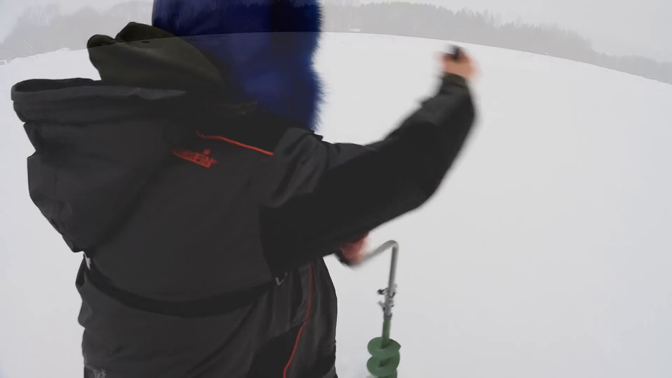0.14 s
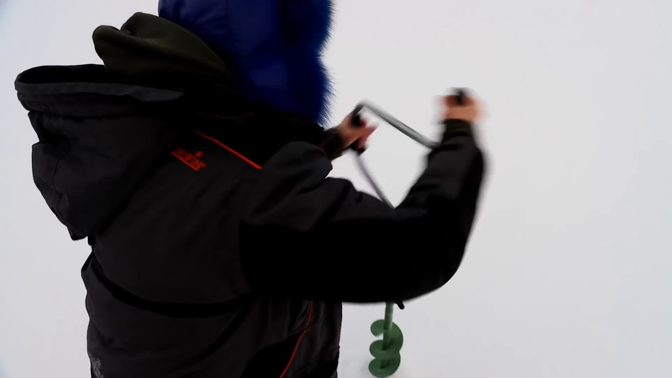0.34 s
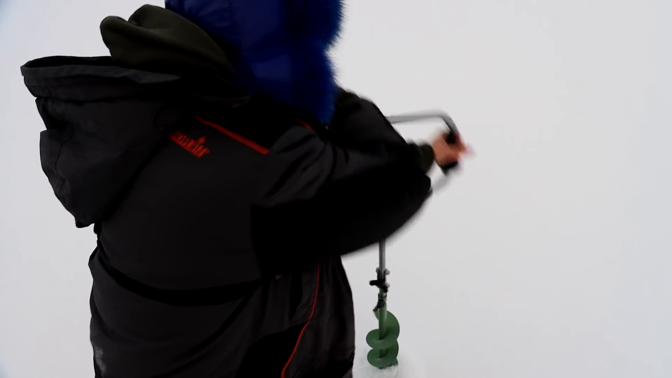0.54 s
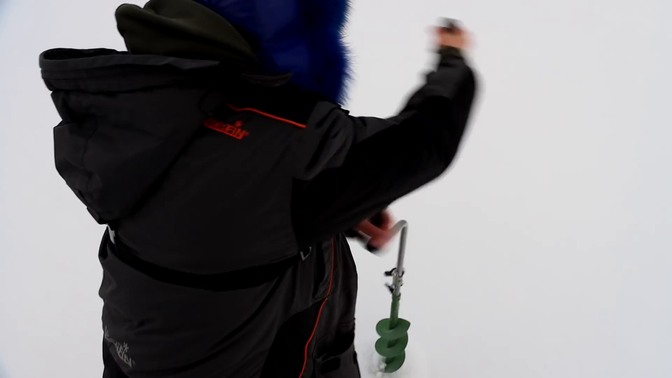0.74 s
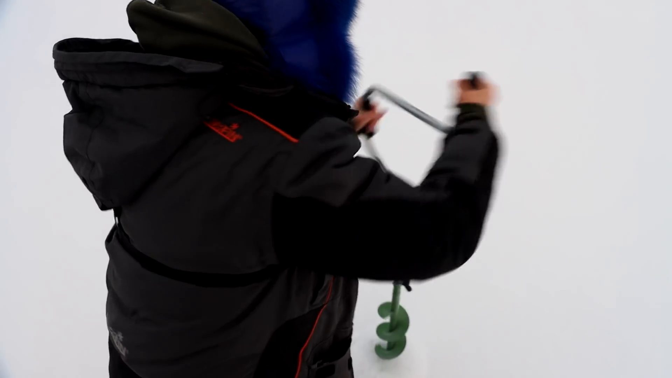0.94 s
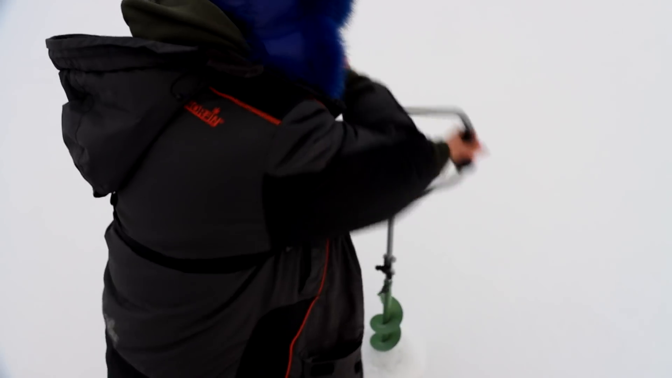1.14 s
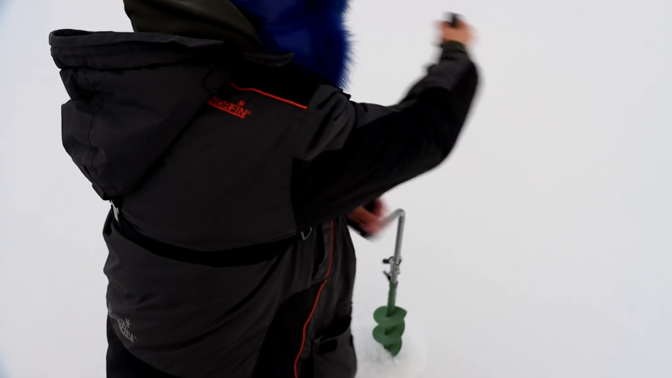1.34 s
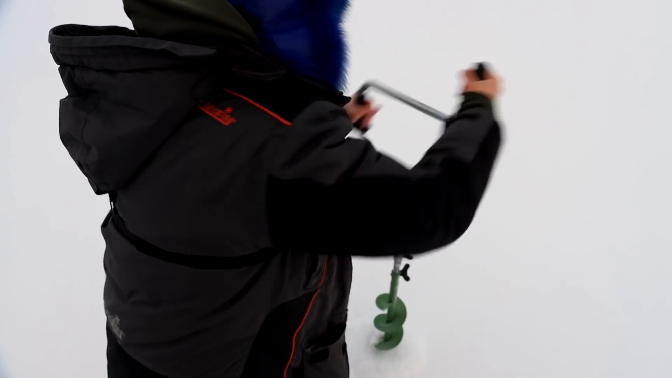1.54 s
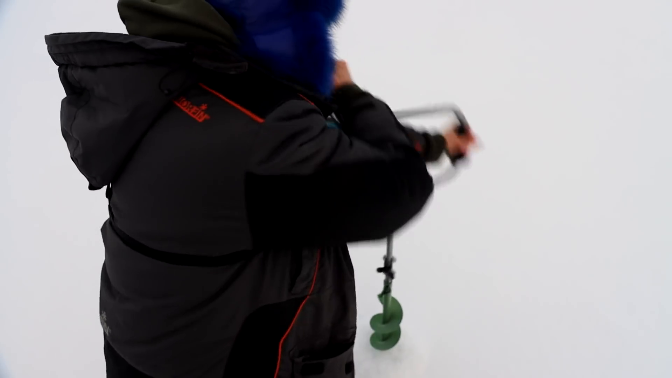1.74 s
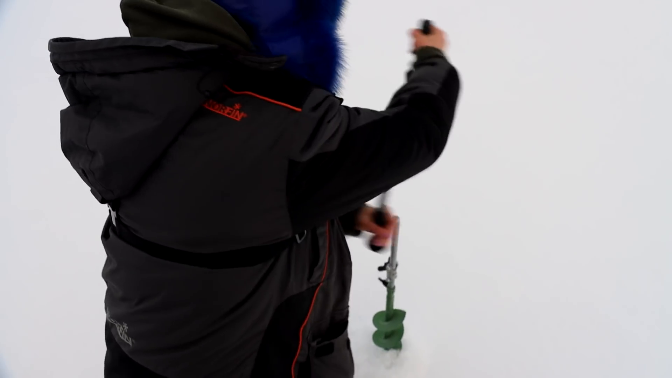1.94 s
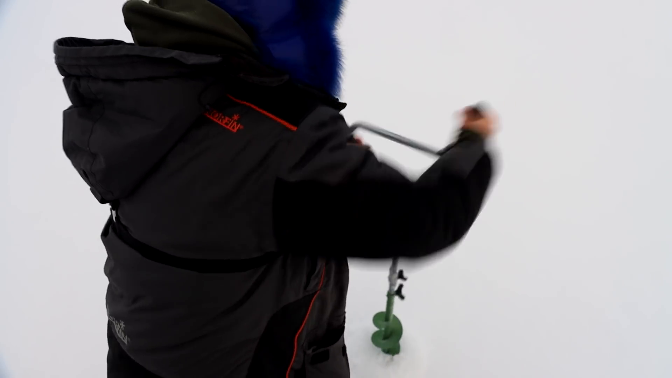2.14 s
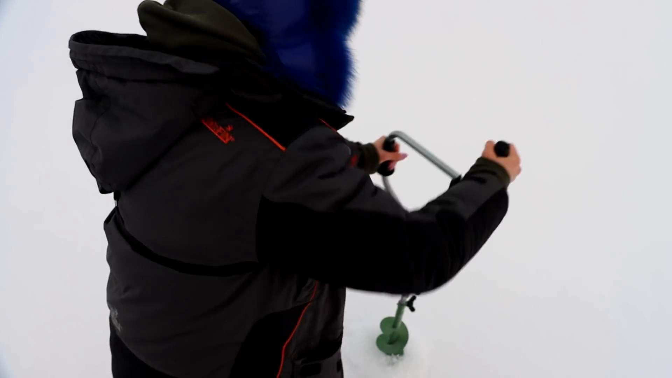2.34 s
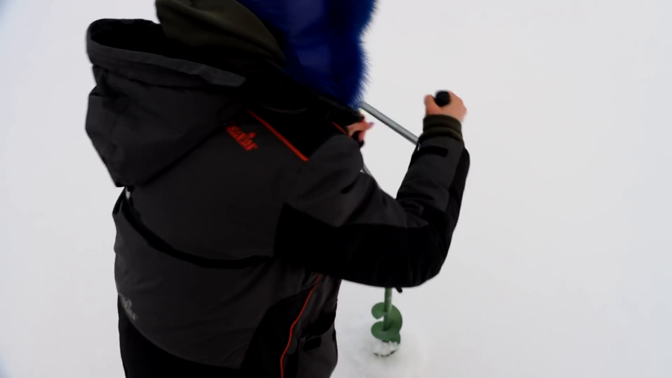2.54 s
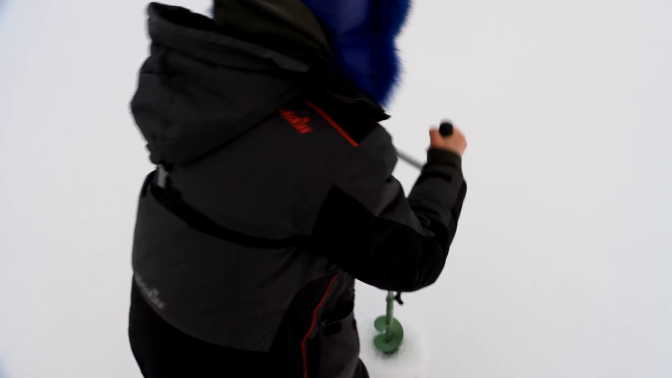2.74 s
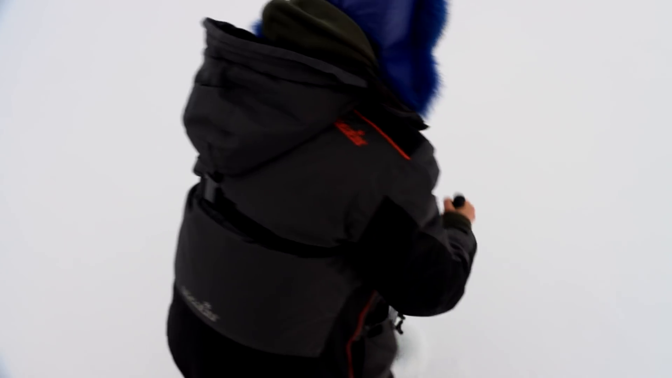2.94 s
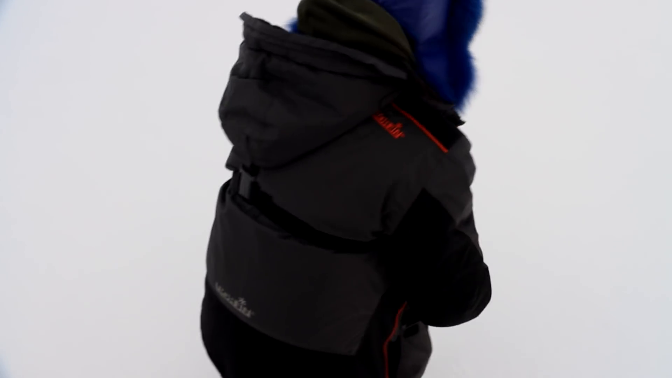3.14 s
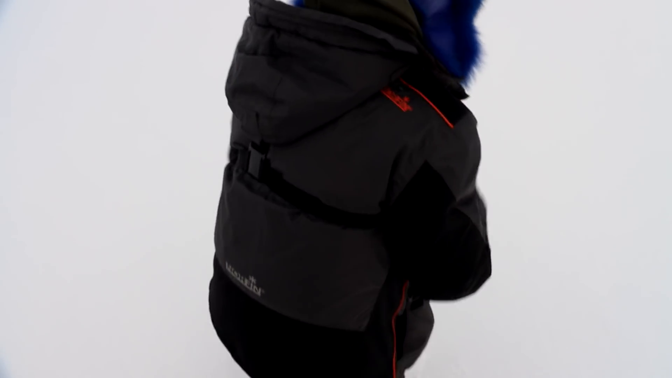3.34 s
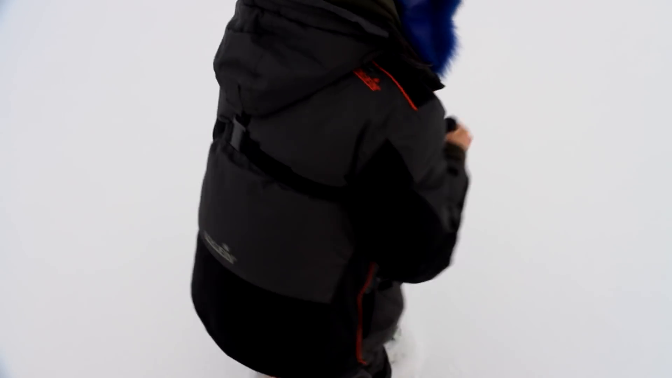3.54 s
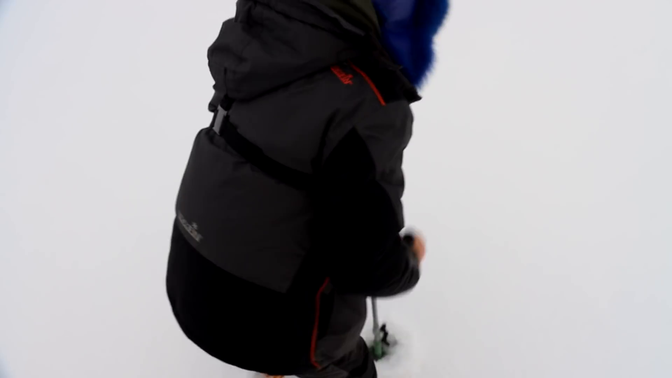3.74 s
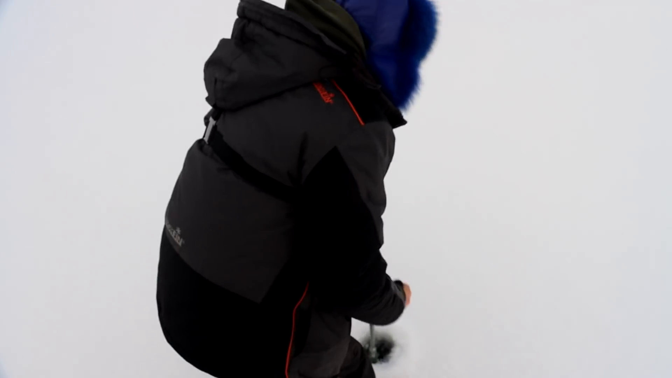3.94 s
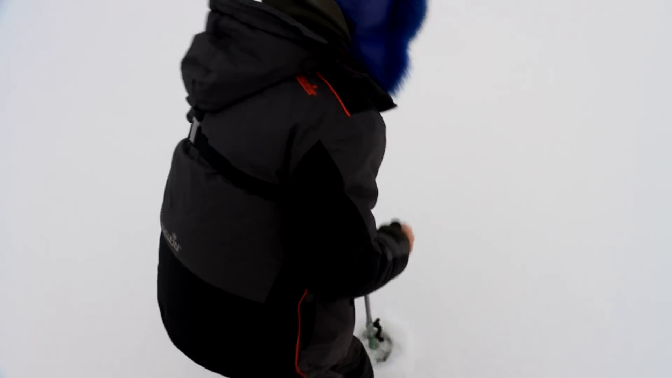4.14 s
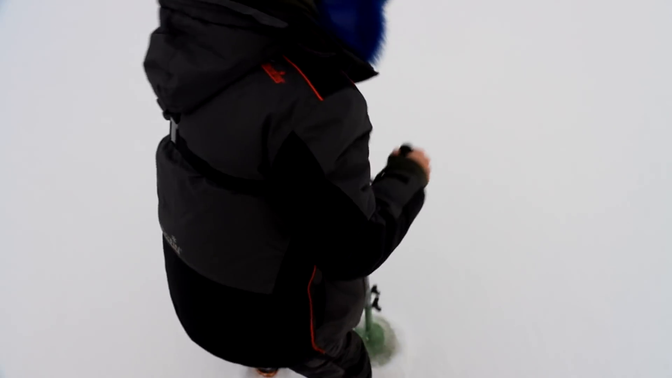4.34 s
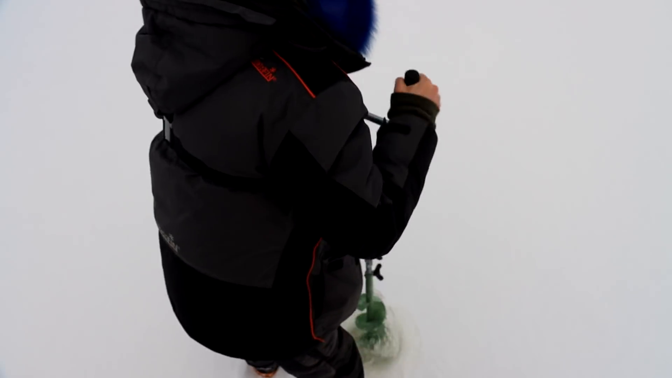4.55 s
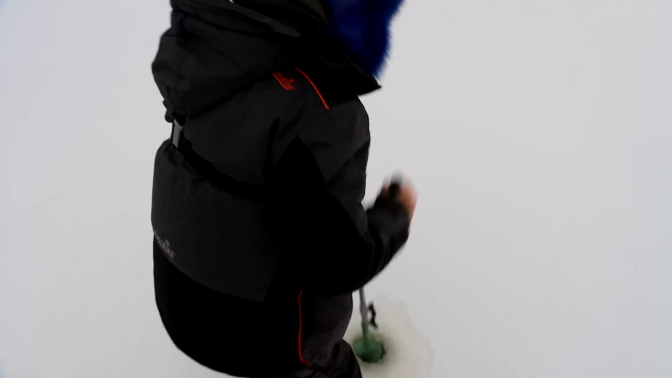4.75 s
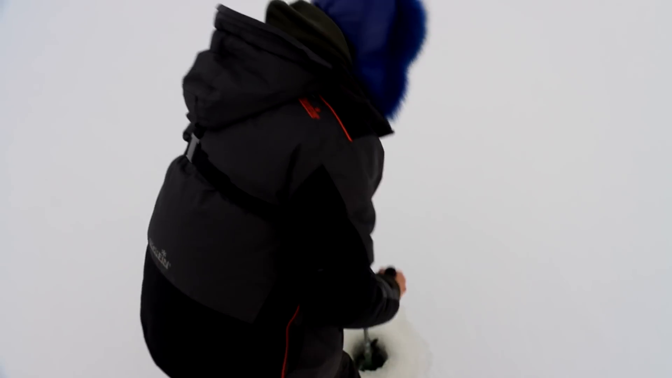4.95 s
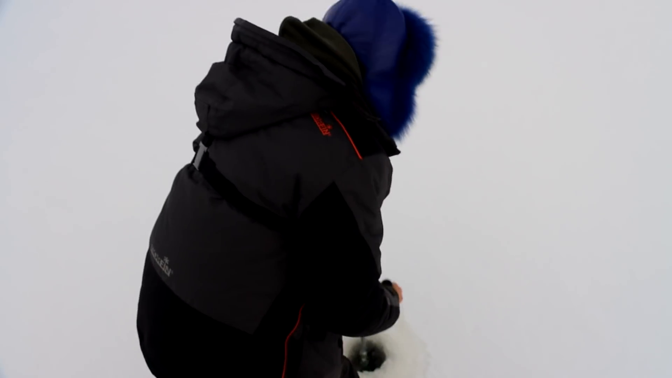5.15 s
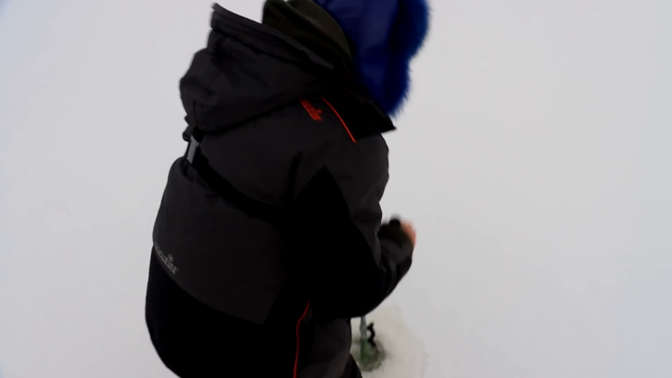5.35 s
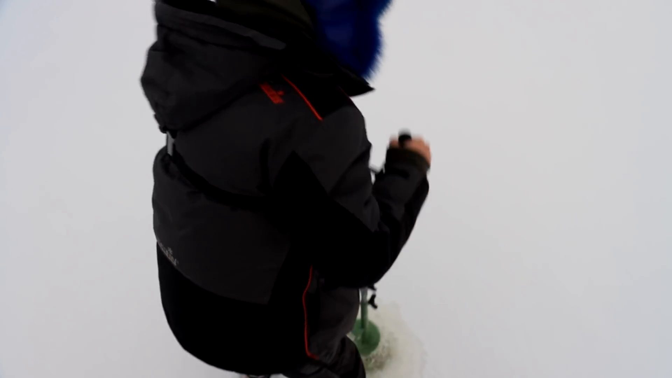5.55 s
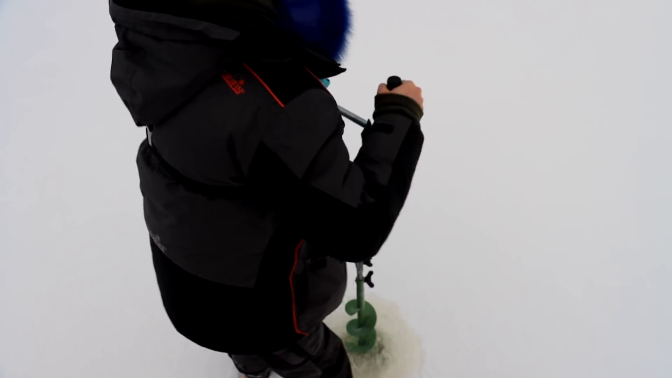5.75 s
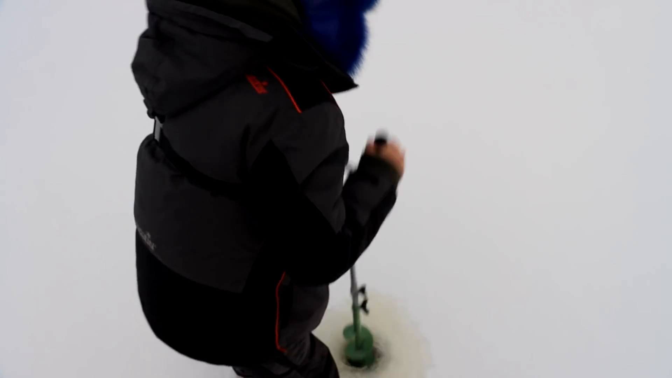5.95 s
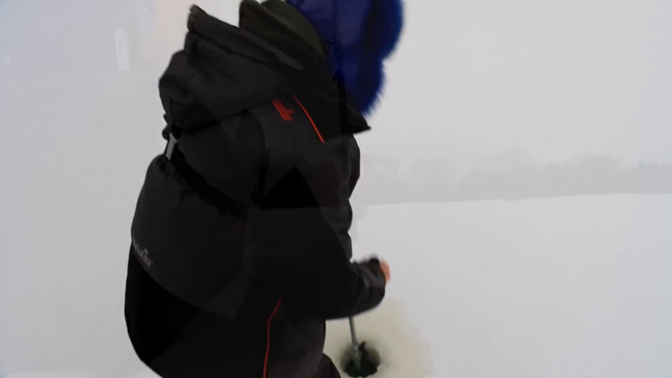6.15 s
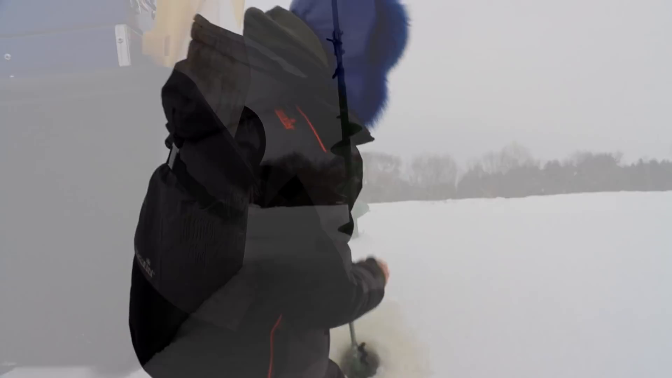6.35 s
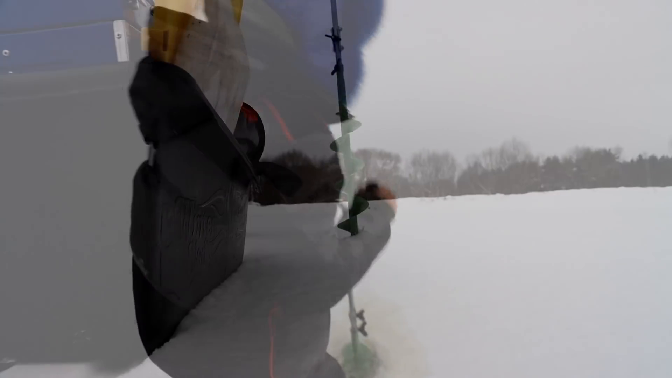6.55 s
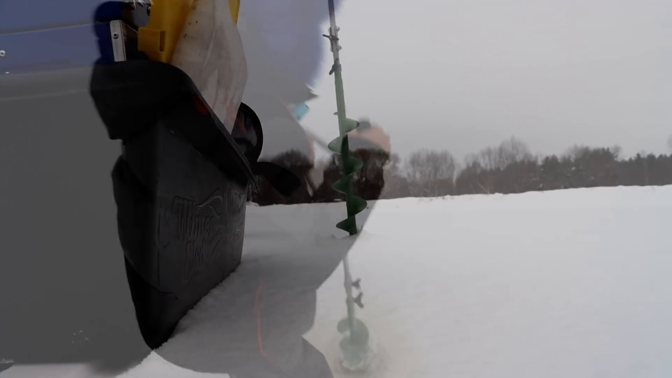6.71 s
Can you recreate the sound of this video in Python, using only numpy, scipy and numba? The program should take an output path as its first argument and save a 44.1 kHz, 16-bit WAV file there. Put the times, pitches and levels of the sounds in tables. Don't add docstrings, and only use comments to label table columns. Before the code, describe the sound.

Scraping, juddering ice drilling for two seconds, then breakthrough and splashy slush churning, hollow water plops and knocks on steel, under faint wind buffeting.

```python
import sys
import numpy as np
from scipy import signal
from scipy.fft import rfft, irfft, next_fast_len
from scipy.io import wavfile
from scipy.ndimage import uniform_filter1d
from numba import njit

SR = 44100
rng = np.random.default_rng(int(sys.argv[2]) if len(sys.argv) > 2 else 0)


def convert_level_to_amplitude(level_db):
    exponent = np.asarray(level_db, float) / 20
    return 10 ** exponent


def log_audio(samples):
    frames = np.atleast_2d(samples).T
    limited = np.clip(frames, -1, 1)
    pcm = np.round(limited * 32767).astype(np.int16)
    wavfile.write(sys.argv[1], SR, pcm)


N = 303408
SIZE = next_fast_len(N + 4096)
FREQ_HZ = np.arange(SIZE // 2 + 1) * SR / SIZE + 1e-3
TIME_S = np.arange(N) / SR

# [f/Hz, density/dB per Hz]
SLUSH_COLOUR = [(88, -61), (150, -22.5), (201, -6.5), (333, -4), (428, 0), (573, 5), (968, -0.5),
                (1480, -9), (2320, -6), (2560, -10.5), (4410, -24.5), (5450, -22.5), (7300, -27),
                (10600, -23.5), (15600, -30.5)]
# [t/s, peak/dB, f/Hz]
PLOPS = [(2.165, -22, 280), (6.09, -15, 310), (2.622, -18.5, 400), (2.791, -19.5, 623), (2.846, -13, 327),
         (2.856, -20, 1014), (3.199, -24, 620), (3.401, -13.5, 362), (3.46, -6, 665), (3.728, -14.5, 593),
         (4.258, -18, 570), (4.291, -25, 490), (4.31, -16.5, 570), (4.359, -19, 750), (4.398, -6.5, 497),
         (4.432, -11.5, 497), (4.52, -9.5, 788), (4.91, -15.5, 640), (5.01, -17, 676),
         (5.055, -20.5, 887.6), (5.058, -22, 184), (5.224, -27.5, 680), (5.569, -6.5, 395),
         (5.538, -20, 560), (5.602, -20, 437), (6.202, -16, 273), (6.608, -17.5, 345)]
# [t/s, peak/dB, f/Hz]
GULPS = [(3.07, -36, 353), (5.236, -35, 185), (5.33, -41, 343), (5.778, -4, 560), (6.792, -20.5, 506),
         (3.4, -12.5, 537), (3.768, -19.5, 530), (3.831, -13, 700), (3.968, -19, 953), (4.163, -23.5, 760),
         (4.461, -21, 910), (4.598, -10.5, 788), (4.81, -19.5, 543), (4.855, -14, 652), (4.951, -8, 622),
         (5.137, -22.5, 523), (5.463, -17, 574), (5.519, -17.5, 492), (6.253, -19.5, 557), (6.32, -29, 354),
         (6.468, -24, 525), (6.555, -24, 346), (6.661, -20.5, 356), (6.844, -15, 618)]
# [t/s, peak/dB, f/Hz]
GURGLES = [(3.507, -23.5, 635), (3.734, -23, 578), (4.231, -25.5, 957), (4.557, -18.5, 675),
           (4.642, -12.5, 482), (4.747, -27, 607), (5.135, -29, 194), (5.566, -9.5, 519), (5.572, -16, 396),
           (5.688, -11, 347), (6.056, -15.5, 552), (6.116, -21, 687), (6.165, -23, 290),
           (6.393, -35, 486.7), (6.702, -20, 466), (6.755, -19, 415), (6.858, -17.5, 486)]


def unit(x):
    return x / np.sqrt(np.mean(x ** 2))


def along(table):
    hz, value = np.transpose(table)
    return np.interp(np.log(FREQ_HZ), np.log(np.maximum(hz, 1)), value)


def curves(table):
    s, *columns = np.transpose(table)
    gate = uniform_filter1d(1. * ((TIME_S >= s[0]) & (TIME_S <= s[-1])), 441)
    return [uniform_filter1d(np.interp(TIME_S, s, c), size=661) for c in columns] + [gate]


def registers(x, colour):
    low_edge_hz, high_edge_hz = 1100, 3600
    cepstrum = irfft(along(colour) * np.log(10) / 20, SIZE)
    cepstrum[1:SIZE // 2] *= 2
    cepstrum[SIZE // 2 + 1:] = 0
    coloured = rfft(x, SIZE) * np.exp(rfft(cepstrum))
    low = 1 / (1 + (FREQ_HZ / low_edge_hz) ** 10)
    high = 1 / (1 + (high_edge_hz / FREQ_HZ) ** 10)
    return [unit(irfft(coloured * part, SIZE)[:N]) for part in (low, 1 - low - high, high)]


def chips(per_s, spread_db, bed):
    struck = rng.random(N) < per_s / SR
    size_db = spread_db * np.minimum(rng.exponential(size=N), 2.6)
    sizes = convert_level_to_amplitude(size_db) * np.sign(rng.standard_normal(N))
    return unit(struck * sizes) + bed * rng.standard_normal(N)


def walk(rate_hz):
    k = int(SR / rate_hz)
    held_levels = rng.standard_normal(N)[np.arange(N) // k]
    return unit(uniform_filter1d(uniform_filter1d(held_levels, k), k))


@njit
def ring(x, hz, width):
    y, band, low = np.empty(len(x)), 0., 0.
    for i in range(len(x)):
        g, k = np.tan(np.pi * hz[i] / SR), width / hz[i]
        v = (band + g * (x[i] - low)) / (1 + g * (g + k))
        band, low, y[i] = 2 * v - band, low + 2 * g * v, k * v
    return y


def swell(s, rise_s, t60_s, round_off=1.27, lead_db=-11):
    rise_s = np.clip(rise_s, .001, .03)
    ahead = SR // 25
    after_s = (np.arange(SR // 5) - ahead) / SR
    grow = np.sin(np.pi / 2 * np.clip(after_s / rise_s, 0, 1)) ** 2
    lead = convert_level_to_amplitude(lead_db) * np.exp(np.minimum(after_s, 0) / (0.74 * rise_s))
    fall = np.maximum(after_s - rise_s, 0) / np.clip(t60_s, .01, .3)
    shape = np.maximum(grow, lead) * convert_level_to_amplitude(-60 * fall ** round_off)
    start = int((s - 0.443 * rise_s) * SR) - ahead
    return slice(start, min(start + len(shape), N)), shape[:N - start]


def held(s, length_s):
    to_end = 0.38 * (s + length_s - TIME_S) + 0.0042
    return np.clip(np.minimum(TIME_S - s, to_end) / 0.0066, 0, 1)


def shimmer(hiss, sway):
    depth = np.clip(0.28 * sway[0], -.9, .9)
    return hiss + depth * ring(hiss, 5200 * (1 + 0.25 * sway[1]), 3100.0)


def crank():
    # [t/s, cut level/dB]
    effort = [(0, -26), (.09, -24), (.2, -27), (.35, -25.5), (.55, -27), (.68, -23), (.8, -23.5), (.9, -26),
              (1.15, -27), (1.3, -23), (1.39, -24.5), (1.478, -22), (1.495, -27), (1.72, -30),
              (1.93, -23.5), (2.06, -24), (2.09, -26.5), (2.3, -27)]
    mean_cut_db, push_range_db = -25, 3.1
    stall_s, stall_width_s, stall_db = 2.196, 0.02, -12
    through_s, fall_db_per_s = 2.278, 650
    grind_db, grind_follows, grind_stalls, deeper_db_per_s = -7.5, 0.24, 1, 2
    hiss_db, hiss_follows, hiss_stalls, last_bite_db = -9, 0.1, .4, 3
    effort_db, _ = curves(effort)
    push_db = effort_db - mean_cut_db
    stall = stall_db * np.exp(-((TIME_S - stall_s) / stall_width_s) ** 2)
    cut_db = effort_db + stall - fall_db_per_s * np.maximum(TIME_S - through_s, 0)
    grind = grind_db + deeper_db_per_s * (TIME_S - 1)
    grind = grind - (1 - grind_follows) * push_db - (1 - grind_stalls) * stall
    hiss = hiss_db - (1 - hiss_follows) * push_db - (1 - hiss_stalls) * stall
    hiss = hiss + last_bite_db * (TIME_S > stall_s)
    return cut_db, grind, hiss, push_db / push_range_db


def judder(per_s):
    turns = np.cumsum(per_s * (1 + 0.104 * walk(25))) / SR
    return np.clip(0.29 + 0.89 * walk(6.04), 0, 2) * np.sin(2 * np.pi * turns)


def blades(bite):
    # [f/Hz, density/dB per Hz]
    cut_colour = [(71, -39.5), (120, -18.5), (235, -7.5), (360, -16.5), (750, -9), (865, -8), (1250, -2),
                  (1500, 5.5), (1910, 5), (2340, 5.5), (3380, -13), (5400, -7), (7180, -12.5), (11200, -12),
                  (15600, -18.5)]
    # [f/Hz, width/Hz, level/dB]
    modes = [(968, 120, -14), (1520, 170, -7), (2326, 264, 1)]
    # [t/s, peak/dB]
    catches = [(0.0428, -24), (0.072, -7), (0.2009, -30), (0.2645, -19), (0.2862, -16), (0.3082, -27),
               (0.3316, -18), (0.401, -7), (0.5581, -18), (0.6254, -12), (0.6584, -20), (0.676, -6),
               (0.701, -5), (0.8345, -36), (0.8504, -21), (0.883, -21), (0.9158, 0), (1.0004, -11),
               (1.0174, -10), (1.063, -11), (1.163, -5), (1.2007, -23), (1.2864, -4), (1.3104, -13),
               (1.3563, -25), (1.377, -15), (1.4794, -7), (1.515, -10), (1.6684, -14), (1.726, -13),
               (1.7794, -9), (1.8618, -6), (1.891, -14), (1.9484, -20), (1.9734, -2), (1.997, -11),
               (2.03, -7), (2.0464, -20), (2.0607, 2), (2.0764, -25), (2.0924, -21), (2.1131, -22),
               (2.141, -6), (2.163, -15)]
    quick, slow, _, _, _, *loads, slip = bite
    cut_db, grind_db, hiss_db, push = crank()
    fracture = chips(per_s=4000, spread_db=4.5, bed=0.66)
    low, middle, high = registers(fracture, cut_colour)
    steel = np.zeros(N)
    for (hz, width_hz, db), load, swing_db in zip(modes, loads, (8, 4.5, -1)):
        mode = unit(ring(fracture, hz * (1 + .022 * load), 1. * width_hz))
        steel += convert_level_to_amplitude(db + 2.4 * load + swing_db * push) * mode
    force = convert_level_to_amplitude(cut_db - 3.5 + 1.8 * slip)
    for s, level_db in catches:
        span, shape = swell(s, 0.0028, 0.013)
        force[span] += convert_level_to_amplitude(min(level_db, -7) - 20) * shape
    grind = convert_level_to_amplitude(grind_db + 0.19 * slow) * low
    rasp = convert_level_to_amplitude(0.81 * quick) * (0.91 * middle + 0.78 * steel)
    powder = convert_level_to_amplitude(hiss_db + 1.0 * quick) * shimmer(high, (.4 * loads[0], loads[1]))
    return force * (grind + rasp + powder)


def stir():
    # [t/s, stir/dB, lift/0-1]
    wash = [(2.28, -46.5, 0.25), (2.59, -42, 0.36), (2.95, -27.5, 0.62), (3.15, -42, 0.59),
            (3.34, -41, 0.39), (3.88, -30.5, 0.43), (4.03, -38.5, 0.86), (4.24, -32.5, 0.52),
            (4.43, -36, 0.25), (4.74, -30, 0.43), (4.92, -31.5, 0.52), (5.2, -34.5, 0.34),
            (5.45, -42.5, 0.41), (5.79, -33, 0.31), (6.0, -38, 0.83), (6.28, -28.5, 0.18),
            (6.52, -51.5, 0.36), (6.88, -31, 0)]
    spray_db, spray_follows, lift_spray_db = -45, 0.81, 16.5
    boom_db, boom_follows, lift_boom_db = -42.5, 0.72, -2.5
    slosh_db, slosh_s, slosh_follows = -32, 0.011, 0.43
    wash_db, lift, gate = curves(wash)
    above_db, lift = wash_db + 38, lift - .5
    slosh = np.zeros(N)
    for s, db, _ in PLOPS + GULPS + GURGLES:
        pulse = np.maximum(TIME_S - s, 0) / slosh_s * np.exp(1 - np.abs(TIME_S - s) / slosh_s)
        slosh += convert_level_to_amplitude(slosh_follows * db + slosh_db) * pulse
    boom = convert_level_to_amplitude(boom_db + boom_follows * above_db + lift_boom_db * lift) + slosh
    spray = spray_db + spray_follows * above_db + lift_spray_db * lift
    return wash_db, 20 * np.log10(boom), spray, gate


def slush(bite):
    # [t/s, peak/dB, f/Hz, spray/dB]
    cracks = [(2.6267, -1, 2230, -16.5), (2.766, -14, 2270, -32), (2.8184, -27, 2620, -15.5),
              (2.857, -10.5, 2040, -29), (3.4002, -13.5, 2060, -60), (3.33, -23.5, 1280, -42),
              (3.606, -40, 1500, -58), (3.78, -21, 1660, -24), (3.857, -31, 1190, -21),
              (3.8625, 0.5, 2280, -15.5), (4.764, -20, 2520, -48), (3.9314, -12.5, 2370, -34),
              (4.458, -14.5, 1800, -44), (4.525, -12.5, 1690, -51), (4.556, -19, 1570, -29),
              (4.81, -33, 2100, -23), (4.9098, -8, 1940, -15.5), (5.009, -7, 2040, -22.5),
              (5.6186, -12.5, 1270, -27), (5.7152, -12.5, 1740, -28), (6.009, -16, 2060, -27.5),
              (6.028, -16, 1860, -59), (6.2083, -5.5, 2090, -16), (6.469, -16.5, 1999, -30.5)]
    # [t/s, peak/dB, f/Hz, spray/dB]
    crunches = [(2.211, -19, 1910, -29), (2.8266, -6, 2590, -15.5), (3.459, -12, 1150, -56),
                (3.498, -17.5, 1470, -59), (3.768, -2.5, 2100, -11), (3.8307, -9.5, 1157, -29),
                (4.298, -18, 1200, -40), (4.397, -14.5, 1200, -29), (4.436, -8.5, 1100, -30),
                (4.513, -17, 2150, -35), (4.5696, -12, 1790, -37), (4.5917, -7.5, 1900, -26.5),
                (5.0284, -11.5, 2174, -28), (5.2257, -23.5, 1308, -37), (5.466, -14.5, 1450, -38),
                (5.566, -9, 1300, -22), (5.7363, -6, 1720, -26.5), (5.7758, -7, 1760, -18),
                (6.1635, -16, 2300, -18.5), (6.5533, -17, 1440, -32.5), (6.658, -15, 1230, -26),
                (6.699, -15, 2010, -26), (6.787, -21, 1440, -27), (6.8404, -13, 1800, -27)]
    # [t/s, peak/dB, f/Hz, spray/dB]
    squelches = [(2.5562, -21, 2140, -42), (2.79, -11.5, 2320, -27), (3.5173, -17.5, 1290, -67),
                 (3.96, -8.5, 2100, -27.5), (4.643, -3, 1780, -22.5), (4.766, -17, 2330, -33),
                 (4.948, -3, 2250, -15), (5.0583, -15, 1470, -37), (5.5097, -14.5, 1960, -35),
                 (5.686, -11.5, 1220, -21.5), (6.0529, -13.5, 2740, -20.5), (6.0904, -31, 2410, -51),
                 (6.271, -15, 1180, -26.5), (6.3938, -24, 1770, -47), (6.441, -19.5, 2110, -35.5),
                 (6.6024, -17, 1980, -33)]
    # [t/s, peak/dB, f/Hz, spray/dB]
    heaves = [
        (3.731, -12, 2370, -28),
        (4.8555, -2.5, 2200, -9.5),
        (6.1102, -1.5, 2270, -12),
        (6.746, -17, 1360, -23.5),
    ]
    # [rise/s, t60/s]
    lump_shapes = [
        (.0048, 0.028),
        (.0052, 0.05),
        (.0055, .082),
        (0.013, 0.047),
    ]
    quick, slow, grains, low_fizz, high_fizz, *loads, _ = bite
    wash_db, boom_db, spray_db, gate = stir()
    low, middle, high = registers(chips(per_s=2500, spread_db=5.0, bed=0.77), SLUSH_COLOUR)
    lumps = []
    for kind, shape in zip((cracks, crunches, squelches, heaves), lump_shapes):
        lumps += [(*lump, *shape) for lump in kind]
    crunch, spray, pitch_hz = np.zeros(N), np.zeros(N), np.full(N, 2000.)
    for s, crunch_db, hz, splash_db, rise_s, t60_s in sorted(lumps):
        span, shape = swell(s, rise_s, t60_s)
        crunch[span] += convert_level_to_amplitude(crunch_db) * shape
        spray[span] += convert_level_to_amplitude(splash_db - 5.5) * shape ** 1.36
        pitch_hz[int((s - rise_s) * SR):] = hz
    crackle = convert_level_to_amplitude(2.5 * walk(350))
    crunch, spray = crunch * crackle, spray * crackle
    ringing = ring(convert_level_to_amplitude(5.5) * crunch * grains, pitch_hz, 153.0)
    boom = gate * convert_level_to_amplitude(boom_db + 1.3 * slow) * (0.5 * low + 0.51 * low_fizz)
    wet = gate * convert_level_to_amplitude(wash_db + 0.5 * quick) * (0.44 * middle + 0.26 * high_fizz)
    spray = spray + gate * convert_level_to_amplitude(spray_db + 0.13 * quick)
    return boom + wet + convert_level_to_amplitude(-17.0) * crunch * middle + spray * shimmer(high, loads[:2]) + ringing


def bubbles(per_s, low_hz, high_hz, cycles, spread_db):
    chance = rng.random((2000, 3))[:int(per_s * N / SR)]
    out, after_s = np.zeros(N + 2048), np.arange(2048) / SR
    for at, pitch, size in chance:
        turns = low_hz * (high_hz / low_hz) ** pitch * after_s
        tone = np.sin(2 * np.pi * turns * (1 + .02 * turns / cycles))
        tone *= turns * np.exp(-turns * 3.0 / cycles)
        out[int(at * N):int(at * N) + 2048] += convert_level_to_amplitude(spread_db * size) * tone
    return unit(out[:N])


def gulps():
    out, after_s = np.zeros(N), (np.arange(SR // 5) - SR // 25) / SR
    thud = registers(rng.standard_normal(N), SLUSH_COLOUR)[0]
    for kind, t60_s in ((PLOPS, 0.039), (GULPS, 0.066), (GURGLES, 0.12)):
        for s, level_db, hz in kind:
            span, shape = swell(s, 0.00594, t60_s, round_off=1.07, lead_db=-19.5)
            t = after_s[:len(shape)]
            phase = 2 * np.pi * hz * t * (1 + 0.95 * t)
            tone = np.sin(phase)
            tone += .35 * np.sin(rng.uniform(1.3, 2.1) * phase)
            tone += .3 * np.sin(rng.uniform(.6, .8) * phase)
            out[span] += convert_level_to_amplitude(level_db) * shape * (0.48 * tone + 0.27 * thud[span])
    return out


def spiral():
    # [t/s, peak/dB, f/Hz]
    knocks = [(2.2139, -12, 2200), (3.4615, -11, 1220), (4.53, -23, 1761), (4.573, -18, 1900),
              (4.596, -16, 1930), (4.587, -25, 1300), (2.7678, -25, 2300), (2.8288, -16, 2640),
              (2.8595, -15, 1100), (3.14, -20.5, 700), (3.212, -24, 800), (3.4016, -18, 920),
              (3.769, -11, 2220), (3.9314, -11.5, 3430), (4.4016, -25, 3600), (4.6437, -9, 1500),
              (4.6924, -29, 2500), (4.7655, -16, 2300), (4.777, -22, 1100), (4.7967, -22, 2543),
              (4.951, -25, 1400), (5.0095, -9, 2120), (5.044, -14, 1450), (5.37, -26, 800),
              (5.476, -18, 1450), (5.7635, -18, 2500), (5.94, -22, 2000), (5.953, -24, 1000),
              (6.172, -14, 800), (6.2075, 1, 2000), (6.25, -17, 1150), (6.277, -12, 1150),
              (6.297, -26, 787)]
    # [t/s, peak/dB, f/Hz]
    loose_ice = [(4.165, -14, 778), (4.23, -15, 985), (4.26, -18, 1140), (4.293, -20, 703),
                 (4.316, -19, 974), (4.398, -14, 703), (4.434, -14, 918), (4.498, -22, 950),
                 (4.511, -9, 813), (4.523, -22, 826), (4.556, -15, 1100), (4.594, -3, 783),
                 (4.643, -2, 1710),
                 (5.059, -14, 1440),
        (5.226, -13, 697),
        (5.36, -30, 829),
        (5.399, -19, 805),
        (5.463, -22, 606),
        (5.474, -13, 1460),
        (5.516, -15, 738),
        (5.521, -6, 622),
        (5.567, -6, 805),
                 (6.395, -26, 1760), (6.445, -27, 2400), (6.445, -20, 2110), (6.463, -20, 2070),
                  (6.551, -17, 961), (6.607, -10, 683), (6.662, -14, 926), (6.7, -22, 864),
                  (6.743, -22, 1520), (6.749, -18, 1270), (6.793, -19, 600), (6.841, -17, 608)]
    # [t/s, length/s, level/dB, f/Hz]
    drags = [
        (2.905, 0.087, -36, 2220),
        (3.046, 0.046, -39, 2520),
        (4.657, 0.09, -38, 1900),
        (4.774, .07, -33.5, 2070),
        (5.024, 0.024, -26, 2270),
        (5.852, 0.23, -39, 2030),
        (6.078, .04, -28, 2210),
    ]
    # [t/s, length/s, level/dB, f/Hz, glide/(1/s)]
    sings = [(4.455, 0.024, -17, 600, 1), (4.733, 0.038, -28.5, 700, -3), (5.575, 0.054, -24, 560, -3),
             (4.6, .03, -23, 610, -1), (5.739, 0.027, -6.5, 580, 3), (6.065, 0.016, -29, 580, -2),
             (6.108, 0.033, -15, 670, -2.5), (5.468, 0.037, -26.5, 370, 4.5), (5.52, 0.03, -25, 480, 2),
             (5.693, 0.05, -22, 600, -0.5), (8.6, 0.025, -29, 590, -1.5), (6.61, 0.033, -29, 380, 1),
             (6.47, 0.042, -35, 610, 0), (6.4, 0.054, -36.5, 520, 0), (6.79, 0.042, -30, 520, -1),
             (4.555, 0.037, -22, 580, 1), (5.81, 0.018, -29, 610, 0)]
    blow, pitch_hz, song = np.zeros(N), np.full(N, 2000.), np.zeros(N)
    rasp, band_hz = np.zeros(N), np.full(N, 2200.)
    rattles = [(s, db - 3.5, hz) for s, db, hz in loose_ice]
    for s, level_db, hz in sorted(knocks + rattles):
        blow[int(s * SR)] = convert_level_to_amplitude(level_db + 26.5)
        pitch_hz[int(s * SR):] = hz
    for s, length_s, level_db, hz in drags:
        rasp += convert_level_to_amplitude(level_db) * held(s, length_s)
        band_hz[int(s * SR):] = hz
    flutter = .07 * walk(150)
    for s, length_s, level_db, hz, glide in sings:
        span = slice(int(s * SR), int((s + length_s) * SR) + SR // 50)
        t = TIME_S[span] - s
        tone = np.sin(2 * np.pi * np.cumsum(hz * (1 + glide * t + flutter[span])) / SR)
        song[span] += convert_level_to_amplitude(level_db) * held(s, length_s)[span] * convert_level_to_amplitude(-5.0 * t / length_s) * tone
    grain = chips(per_s=1500, spread_db=2.0, bed=0.36)
    grit = unit(ring(grain, band_hz * (1 + 0.07 * walk(30)), 350.0))
    scrape = rasp * convert_level_to_amplitude(3.3 * walk(50)) * grit
    return ring(blow, pitch_hz, 280.0) + scrape + convert_level_to_amplitude(1.7 * walk(120)) * song


def pocket():
    # [t/s, f/Hz, level/dB]
    squeeze = [
        (4.822, 189.7, -44),
        (4.845, 202, -36),
        (4.96, 287.5, -27.5),
        (5.07, 375, -41),
    ]
    hz, level_db, gate = curves(squeeze)
    hum = np.sin(2 * np.pi * np.cumsum(hz * (1 + .11 * walk(70))) / SR)
    rough = unit(ring(rng.standard_normal(N), 1.3 * hz, 140.))
    return gate * convert_level_to_amplitude(level_db + 0.5 + 3.0 * walk(60)) * (.8 * hum + .5 * rough)


def snaps():
    # [t/s, peak/dB]
    ticks = [(2.2126, -15), (2.245, -24), (2.284, -25), (6.415, -30), (6.642, -32), (2.396, -22),
             (2.448, -41), (2.5503, -22), (3.606, -34), (3.705, -25), (3.895, -32), (5.784, -3),
             (2.5272, -37), (2.7222, -15.5), (4.417, -22), (5.2669, -14.5), (5.3956, -20.5), (5.834, -36),
             (5.925, -13)]
    click = np.zeros(N)
    for s, level_db in ticks:
        click[int(s * SR)] = convert_level_to_amplitude(level_db + 9)
    return ring(click, np.full(N, 4500.), 9700.0)


def thumps():
    # [t/s, peak/dB]
    puffs = [
        (1.24, -38),
        (2.515, -32),
        (3.656, -28),
        (5.039, -41),
    ]
    out, after_s = np.zeros(N), np.arange(SR // 20) / SR
    swing = np.sin(2 * np.pi * 75 * after_s) * np.exp(-after_s / 0.0099)
    for s, level_db in puffs:
        out[int(s * SR):int(s * SR) + len(after_s)] += convert_level_to_amplitude(level_db + 4.5) * swing
    return out


def wind():
    # [t/s, level/dB]
    gusts = [(0.0, -57.5), (0.17, -51), (1.15, -62), (1.24, -39.5), (1.32, -52.5), (2.03, -56),
             (2.36, -57.5), (2.53, -46), (2.59, -43.5), (3.43, -48), (3.66, -37.5), (3.77, -57),
             (3.85, -46.5), (5.25, -53), (5.33, -46), (6.02, -56), (6.09, -41), (6.88, -56)]
    # [f/Hz, density/dB per Hz]
    wind_colour = [(12, -50), (24, -21), (43, -2), (70, -2), (92, -2.5), (190, -7), (250, -5.5),
                   (420, -120)]
    level_db, _ = curves(gusts)
    rumble = irfft(rfft(rng.standard_normal(N), SIZE) * convert_level_to_amplitude(along(wind_colour)), SIZE)[:N]
    return convert_level_to_amplitude(level_db + 4.4 * walk(22)) * unit(rumble)


def scene():
    # [f/Hz, level/dB]
    port_balance = [(60, -10), (110, -8), (200, 0.5), (380, -3), (700, -4.5), (1290, -3), (2380, -11.5),
                    (4400, -3.5), (8120, -16), (15000, -22)]
    # [f/Hz, phase/rad]
    port_phase = [(70, 1.4), (140, 0), (600, -.5), (1810, -1.4), (2670, -.5), (4650, -2.4), (7670, -3.2),
                  (10600, -4.2), (15000, -4.5)]
    # [f/Hz, share/0-1]
    port_likeness = [(40, 0), (120, 0.68), (300, 0.92), (1000, 1), (2500, 1), (5000, 0.18), (12000, 0.4)]
    # [f/Hz, level/dB]
    capsule = [(3700, -0.5), (4300, -2), (4900, -0.5), (7200, -1.5), (8300, 0.5), (11300, 2.5), (12300, -1),
               (13000, -6.5), (15300, -6)]
    low_fizz = bubbles(per_s=70, low_hz=280, high_hz=1000, cycles=9, spread_db=14)
    high_fizz = bubbles(per_s=260, low_hz=1000, high_hz=3000, cycles=8, spread_db=16)
    quick, slow = walk(60), walk(23.98)
    grains = 0.79 * chips(per_s=2500, spread_db=6.5, bed=0.65)
    loads = walk(17), walk(20.38), walk(25.4)
    bite = (quick, slow, grains, low_fizz, high_fizz, *loads, judder(65))
    hole = pocket() + gulps() + snaps() + thumps() + spiral()
    shared, own = (rfft(blades(bite) + slush(bite) + wind() + hole, SIZE) for _ in range(2))
    shadow = convert_level_to_amplitude(along(port_balance))
    lag = np.exp(1j * along(port_phase))
    like = np.clip(along(port_likeness), 0, 1)
    mid = np.sqrt(1 + shadow ** 2 + 2 * shadow * np.sqrt(like) * lag.real)
    scale = 2 * convert_level_to_amplitude(along(capsule)) / mid
    left = shadow * lag * (np.sqrt(like) * shared + np.sqrt(1 - like) * own)
    return irfft(scale * np.array([left, shared]), SIZE)[:, :N]


def band_limit(x):
    return signal.sosfilt(signal.butter(12, 15720, fs=SR, output="sos"), x)


def record(dry):
    return band_limit(np.clip(dry, -1, 1))


dry = scene()
out = record(dry)
log_audio(out)
```